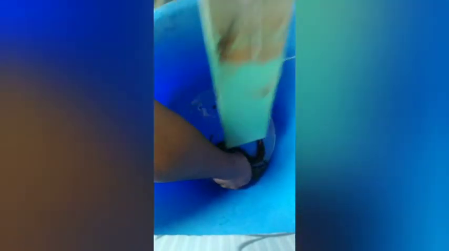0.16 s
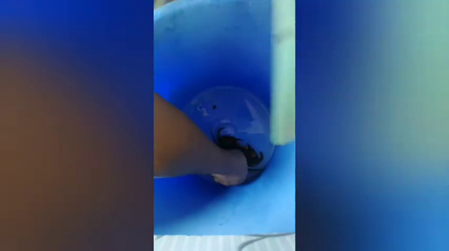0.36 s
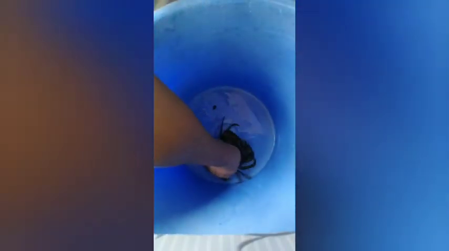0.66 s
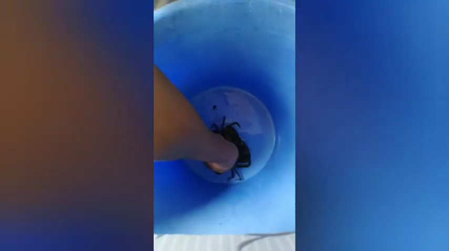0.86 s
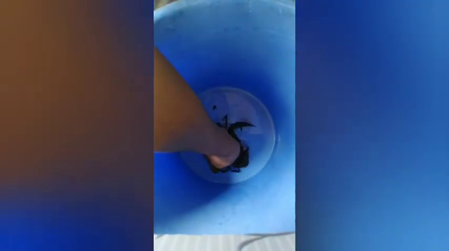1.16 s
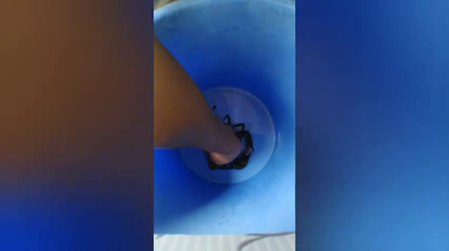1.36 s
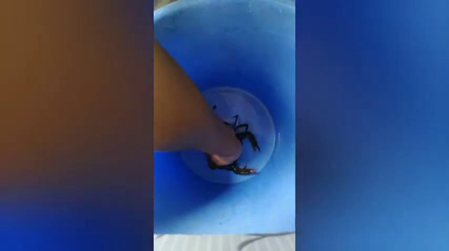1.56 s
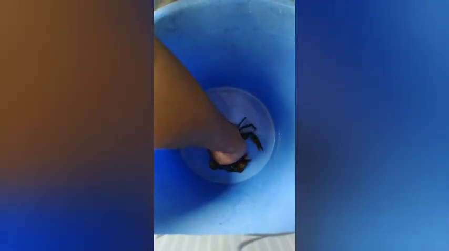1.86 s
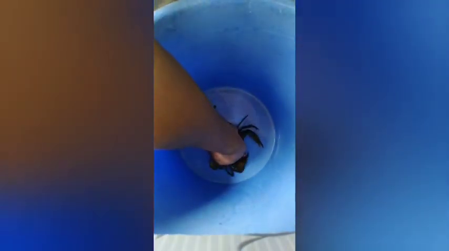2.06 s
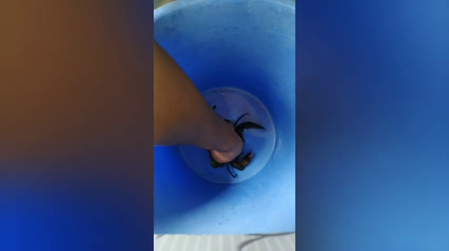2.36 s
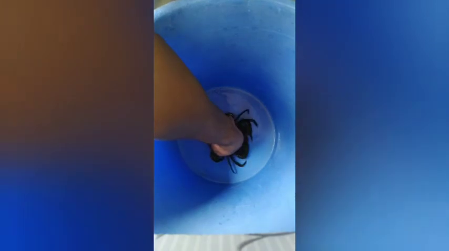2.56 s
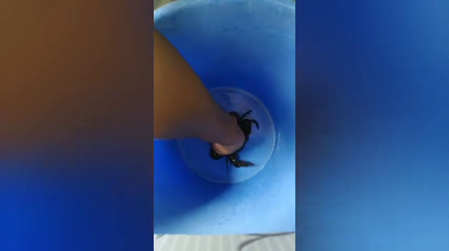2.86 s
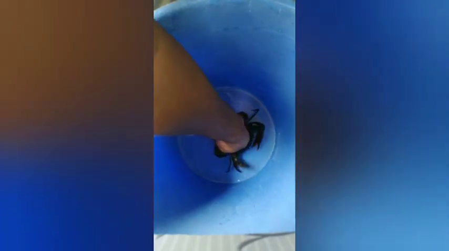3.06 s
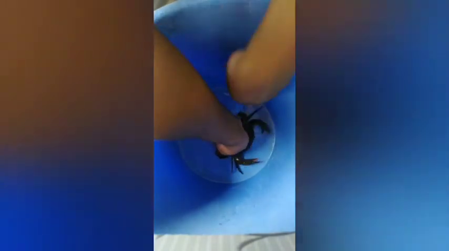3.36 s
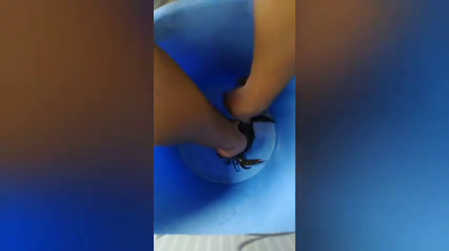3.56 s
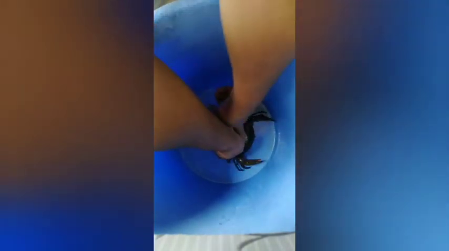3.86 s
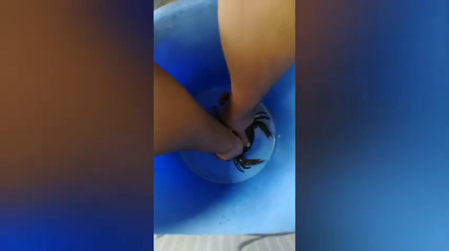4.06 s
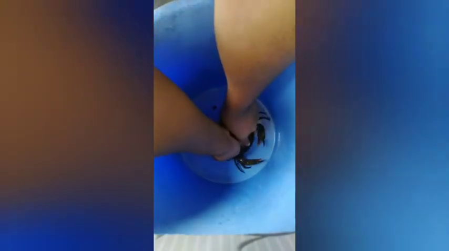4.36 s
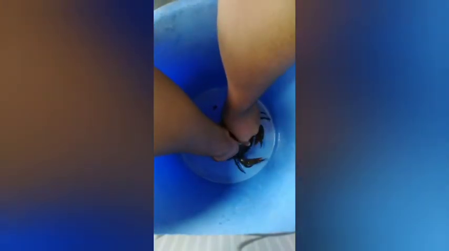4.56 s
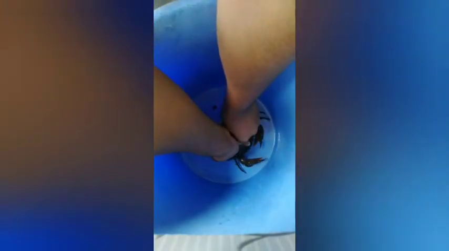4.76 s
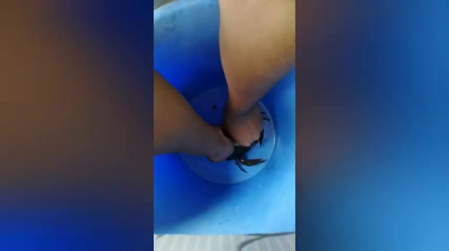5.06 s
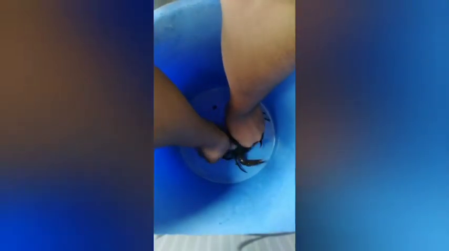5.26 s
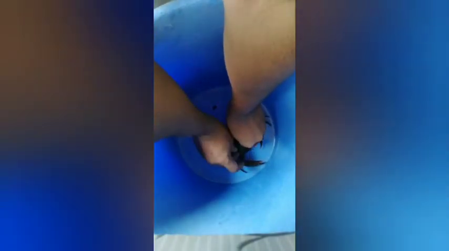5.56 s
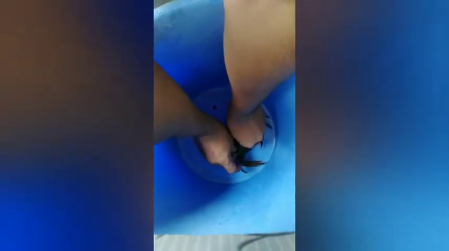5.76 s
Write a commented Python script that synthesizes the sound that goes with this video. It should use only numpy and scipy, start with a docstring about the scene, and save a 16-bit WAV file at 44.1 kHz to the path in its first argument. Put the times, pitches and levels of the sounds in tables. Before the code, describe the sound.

A live crab held by hand against the bottom of a plastic bucket scrapes, clacks and squeaks in uneven bursts, with dull low thumps as weight shifts. After about three and a half seconds the activity drops to sparse faint ticks over a soft outdoor hush, ending with a small knock. Close stereo microphones just above the rim, most sounds leaning right.

```python
"""Outdoors, a hand pins a live crab to the bottom of a plastic bucket, heard by two microphones just above the rim.
Legs and shell scrape the wall: stick-slip trains excite its bending modes, and locked slips squeak as gliding tones.
Claws knock, as clicks that set the wall modes ringing; shoves and rocking sound the low modes of the bottom.
A short echo inside the bucket, faint tones from afar and a soft hush of filtered noise complete the scene."""
import sys
import numpy as np
from scipy import signal
from scipy.fft import rfft, irfft, next_fast_len
from scipy.io import wavfile
from scipy.ndimage import uniform_filter1d

SR = 44100
rng = np.random.default_rng(int(sys.argv[2]) if len(sys.argv) > 2 else 0)


def wav_out(sig):
    """Save sig, one row per channel (or a flat mono array), as 16-bit PCM at SR to the path in sys.argv[1]."""
    wavfile.write(sys.argv[1], SR, np.round(np.clip(np.atleast_2d(sig).T, -1, 1) * 32767).astype(np.int16))


def ratio(d):
    """dB to gain"""
    e = np.asarray(d, float) / 20
    return 10 ** e


N = 260190   # samples
STEP = 40   # samples between control points

# All levels in the tables are relative dB.
# Legs and shell dragged on the wall. Each row: peak time in seconds, rise in seconds, fall in seconds,
# ring level in dB, rasp above ring in dB.
SCRAPES = [(0.04, 0.036, 0.16, -30.5, -6), (0.224, 0.032, 0.14, -30, -8.5),
           (0.329, 0.0022, 0.026, -28.5, -1), (0.426, 0.002, 0.049, -21, -2),
           (0.436, 0.016, 0.074, -22.5, -14), (0.587, 0.0065, 0.12, -36.5, -3.5),
           (0.624, 0.002, 0.03, -27.5, 2), (0.701, 0.11, 0.14, -38, -16), (0.732, 0.0042, 0.038, -29, -6.5),
           (0.839, 0.01, 0.037, -29.5, -5), (0.96, 0.0024, 0.088, -25, -4.5),
           (1.007, 0.0072, 0.023, -23, -3), (1.155, 0.033, 0.013, -29, -8.5),
           (1.213, 0.046, 0.21, -37, -18), (1.276, 0.055, 0.053, -22.5, -1), (1.38, 0.018, 0.065, -26, -7),
           (1.409, 0.002, 0.058, -24, -3), (1.734, 0.0093, 0.057, -24, -8.5),
           (2.173, 0.057, 0.053, -35, -7), (2.33, 0.0066, 0.0092, -45, -14),
           (2.344, 0.02, 0.051, -23.5, -5), (2.381, 0.0054, 0.068, -35, 7.5),
           (2.447, 0.12, 0.052, -22, -4.5), (2.542, 0.03, 0.025, -29, -11.5), (2.587, 0.018, 0.041, -31, 1),
           (2.639, 0.012, 0.073, -26.5, -1.5), (2.726, 0.051, 0.028, -28, -13),
           (2.773, 0.028, 0.216, -47.5, -7.5), (2.873, 0.021, 0.088, -29, -3),
           (2.915, 0.064, 0.071, -29.5, -1.5), (2.958, 0.035, 0.023, -27.5, -24),
           (3.009, 0.059, 0.042, -24, -9), (3.055, 0.094, 0.059, -23.5, -4.5),
           (3.169, 0.01, 0.026, -37.5, -3.5), (3.256, 0.027, 0.027, -32.5, -19.5),
           (3.278, 0.017, 0.044, -30, -24), (3.284, 0.09, 0.067, -36.5, -9.5),
           (3.402, 0.0098, 0.065, -33, -6.5), (3.934, 0.0055, 0.046, -44.5, 1.5),
           (4.098, 0.0077, 0.027, -49, -13), (4.219, 0.15, 0.033, -47.5, -14.5),
           (4.737, 0.01, 0.02, -42, -8), (5.177, 0.0058, 0.057, -52.5, -13),
           (5.466, 0.0074, 0.029, -50, 2.5), (5.615, 0.0035, 0.042, -62.5, 10),
           (5.807, 0.0072, 0.047, -40.5, -3)]
# The place of contact wandering over the wall. Each row: time in seconds, best-excited ring pitch in Hz,
# best-excited rasp pitch in Hz, left minus right in dB.
CONTACT = [(0.04, 900, 4400, -53), (0.29, 1260, 4430, -40), (0.33, 1170, 7100, -29),
           (0.426, 1140, 3700, -8.5), (0.437, 543, 3500, -9.5), (0.62, 1230, 5500, -24),
           (0.74, 850, 5200, -42), (0.96, 1380, 3100, -24), (1.2, 1170, 3500, -14),
           (1.279, 1270, 4500, -9.5), (1.371, 1210, 5300, -24), (1.409, 1830, 4500, -0.5),
           (1.73, 1010, 3200, -4), (2.171, 1200, 3500, -35), (2.35, 1960, 3500, -14),
           (2.43, 1980, 5500, 1.5), (2.54, 1010, 3200, -31), (2.73, 1020, 4000, -40),
           (2.88, 1260, 3700, -47), (2.96, 1160, 4500, -32), (3.051, 1200, 5200, -41),
           (3.17, 1150, 6200, -20), (3.27, 1160, 3000, -42), (3.41, 1010, 3200, -5), (3.93, 690, 4500, -31),
           (4.1, 550, 3500, -8), (4.74, 550, 3000, -12), (5.18, 1910, 3000, -13), (5.47, 2250, 3700, -17),
           (5.62, 1800, 5300, -2), (5.8, 2330, 3300, -14)]
# Bending modes of the wall. Each row: frequency in Hz, level in dB, undamped t60 in seconds.
WALL_MODES = [(553.5, -5, 0.5), (700, 2, 0.13), (801, -1.5, 0.077), (900, -31, 0.32), (1041, -1.5, 0.05),
              (1123, -6.5, 0.032), (1178, 1, 0.061), (1343, 3.5, 0.02), (1518, -3.5, 0.066),
              (1743, -6, 0.092), (1882, -5.5, 0.077), (2183, -1.5, 0.024), (2460, 2.5, 0.024),
              (2690, -0.5, 0.041)]
# Spectrum of the short high wall modes. Each row: frequency in Hz, level in dB per Hz.
RASP_SPECTRUM = [(1530, -30), (2600, -5), (3320, -3.5), (4390, -7.5), (5270, -7), (5870, -9), (7480, -8.5),
                 (8780, -22), (14400, -27.5), (16000, -48)]
# Shell squeaking where slips lock to one rate. Each row: peak time in seconds, rise in seconds, fall in seconds,
# level in dB, pitch at the peak in Hz, glide in Hz per second.
SQUEAKS = [(1.11, 0.024, 0.26, -38, 982, 609.5), (1.15, 0.01, 0.037, -39, 2475, 2),
           (1.22, 0.037, 0.09, -28.5, 1237, 597.5), (1.387, 0.031, 0.029, -42, 5260, -1),
           (1.419, 0.0098, 0.033, -20.5, 1703, -800), (2.396, 0.016, 0.032, -26, 1750, -2.5),
           (2.884, 0.024, 0.058, -30.5, 2460, -2.5)]
# Claws and knuckles on the wall. Each row: time in seconds, peak level in dB, snap above peak in dB,
# left minus right in dB.
KNOCKS = [(0.042, -14.5, 2, -29), (0.327, -10, -26, -39), (0.424, -23, 2, 0), (0.624, -19.5, 13.5, -30),
          (0.71, -29, -10, -31), (0.733, -23, -17, -28), (0.84, -34, -5, -24), (0.958, -6.5, -33, -16.5),
          (1.006, -29, -3, 10), (1.212, -43, -12, -20), (1.285, -11.5, 0, 10), (1.407, -15.5, 10.5, -9),
          (1.735, -10, -2, -40), (2.329, -20, -2, -22), (2.381, -24.5, 21.5, 3), (2.574, -31.5, 14.5, -27),
          (2.641, -19, -23, -33), (3.094, -29, 13.5, -27.5), (3.4, -19, -5, -28), (3.933, -25.5, -4, -14),
          (5.467, -46, 4, -12), (5.805, -26.5, 3.5, -23)]
# Weight shifting on the bottom. Each row: peak time in seconds, rise in seconds, fall in seconds, boom level in dB.
SHOVES = [(0.062, 0.071, 0.25, -32.5), (0.348, 0.03, 0.027, -27), (0.436, 0.014, 0.063, -17.5),
          (0.747, 0.049, 0.0063, -27), (0.793, 0.046, 0.013, -32), (0.92, 0.056, 0.023, -29.5),
          (1.312, 0.047, 0.067, -19.5), (1.742, 0.018, 0.064, -22), (2.19, 0.06, 0.051, -39),
          (2.455, 0.02, 0.056, -17), (2.598, 0.015, 0.037, -23.5), (2.64, 0.012, 0.078, -21.5),
          (2.96, 0.006, 0.046, -27), (3.074, 0.045, 0.065, -23), (3.55, 0.02, 0.044, -40),
          (4.251, 0.1, 0.031, -42.5), (4.41, 0.057, 0.065, -42.5), (4.62, 0.073, 0.031, -50.5),
          (4.73, 0.092, 0.053, -42.5), (5.81, 0.012, 0.051, -38.5)]
# Modes of the bottom and the air column, deepest first. Each row: frequency in Hz, level in dB, t60 in seconds.
BOTTOM_MODES = [(126.4, 3.5, 0.14), (182, -5.5, 0.14), (232.4, 8, 0.29), (276, 0, 0.1), (302.4, -5, 0.093),
                (341.5, -2.5, 0.083), (398, -3.5, 0.11), (466.5, -7, 0.083), (590, -6, 0.067)]
# The whole bucket rocking and landing. Each row: peak time in seconds, level in dB.
ROCKS = [(0.46, -30.5), (0.92, -46.5), (3.42, -57)]
# Faint tones from afar. Each row: peak time in seconds, rise in seconds, fall in seconds, level in dB, pitch in Hz.
FAR_TONES = [(1.95, 0.24, 0.86, -65, 590), (4.1, 1, 1, -62.5, 660.5), (5.82, 0.038, 0.063, -41.5, 936)]
# Spectrum of the outdoor hush. Each row: frequency in Hz, level in dB per Hz.
HUSH_SPECTRUM = [(20, -46.5), (60, -8.5), (120, 4.5), (300, 3), (480, 1), (600, 1.5), (850, 1),
                 (1400, -3.5), (2300, -6), (3500, -9.5), (5000, -7.5), (7600, -11), (8600, -26.5),
                 (16000, -36.5)]
# Course of the hush. Each row: time in seconds, level in dB.
HUSH_LEVEL = [(0.0, -54), (1.1, -50), (2.101, -57.5), (2.48, -50.5), (3.779, -56), (5.9, -60)]
# Likeness of the hush at the two microphones. Each row: frequency in Hz, left-right correlation (no unit).
HUSH_LIKENESS = [(100, 0.88), (500, 1), (1000, 0.65), (2000, 0.7), (5000, 0.015)]
# Balance of the hush. Each row: frequency in Hz, left minus right in dB.
HUSH_BALANCE = [(60, -5), (240, -6), (950, 1.5), (3770, -2), (15000, -5.5)]

RUBBED_DAMPING, RASP_FALL_SHARE = 0.48, 0.87   # share of undamped t60 under a limb; rasp fall over ring fall
RASP_CHANCE_DB, RASP_CYCLES = 4, 15   # uneven rasp mode shares per stroke; cycles per t60
LEAN_DB, LEAN_LAG_S = -10, 0.013   # push on the bottom with each scrape: its table level against the ring, its delay
DEEP_DB = -17.5   # level offset of the deepest mode in all pushes
BOOM_BALANCE_DB = -7   # left minus right
ROCK_RISE_S, ROCK_FALL_S = 0.026, 0.063
LEFT_LAG = 17   # samples by which the farther left microphone hears later


def rms_one(x):
    """Normalisation: scale to unit rms."""
    return x / np.sqrt(np.mean(x ** 2) + 1e-20)


def at_hz(points, hz):
    """Interpolation on a logarithmic frequency axis."""
    point_hz, values = np.transpose(points)
    return np.interp(np.log(hz + 1), np.log(point_hz), values)


def full_rate(control):
    """Linear interpolation of control points to one value a sample."""
    return np.interp(np.arange(N) / STEP, np.arange(len(control)), control)


def swells(s, rise, fall, level_db):
    """Power envelopes: each stroke is 20 dB down one rise before and one fall after its peak."""
    late = np.arange(N // STEP + 2) * STEP / SR - s[:, None]
    scale = np.where(late < 0, rise[:, None], fall[:, None])
    lengths = np.abs(late) / np.maximum(scale, .002)
    curve = np.where(late < 0, 1.5, 1.25)
    return ratio(level_db[:, None] - 20 * lengths ** curve) ** 2


def drift(rate_hz):
    """Low-passed noise: a slow random course of unit rms."""
    r = np.exp(-2 * np.pi * STEP * rate_hz / SR)
    noise = rng.standard_normal(N // STEP + 2002)
    slow = signal.lfilter([1], [1, -2 * r, r * r], noise)[2000:]   # drop the filter's start
    return full_rate(rms_one(slow))


def ring(clicks, hz, t60):
    """Damped resonance: a unit click starts a decaying sine of initial height 1."""
    r = ratio(-60 / (max(t60, .003) * SR))
    w = 2 * np.pi * hz / SR
    return signal.lfilter([0, np.sin(w)], [1, -2 * r * np.cos(w), r * r], clicks + 1e-18)


def slips(per_s, spread_db, clump_db, clump_hz, channels):
    """Stick-slip friction: random slips of uneven size, in clumps, with random signs at each microphone."""
    sizes = ratio(spread_db * np.minimum(rng.exponential(1, N), 4) + clump_db * drift(clump_hz))
    happens = rng.random(N) < per_s / SR
    return sizes * happens * rng.choice([-1, 1], (channels, N))


def sides(pan_db):
    """Level difference: left and right gains of constant total power."""
    gains = ratio(np.array([pan_db / 2, -pan_db / 2]))
    return 2 * gains / np.sqrt(np.sum(gains ** 2, axis=0))


def evened(x, window_s):
    """Level equalisation: hold the slow rms at 1, so that the stroke sets the loudness."""
    return x / np.sqrt(uniform_filter1d(x ** 2, int(window_s * SR), axis=-1) + 1e-12)


def rubbed(modes, shares_db, power, pans, trains, wander_db, wander_hz):
    """Driven resonance: slip trains sustain the modes, among which each stroke divides its power in its own way."""
    shares = ratio(shares_db) ** 2
    shares = shares / shares.sum(axis=1, keepdims=True)
    out = 0
    for k, (hz, t60) in enumerate(modes):
        gains = [full_rate(np.sqrt((shares[:, k] * pan ** 2) @ power)) for pan in pans]
        once = ring(trains[k % len(trains)], hz, t60 / 4)
        tone = evened(ring(once, hz, t60), 0.081)   # two passes of the resonance give it steeper skirts
        out = out + tone * gains * ratio(wander_db * drift(wander_hz) - 1)
    return out


def contact(s):
    """Point of excitation: best-excited ring and rasp pitch and left-right balance at the given moments."""
    at, *columns = np.transpose(CONTACT)
    return [np.interp(s, at, column) for column in columns]


def scraping(focus_db=10.0, chance_db=3.0, rasp_focus_db=6.5):
    """Modal excitation by friction: strokes favour modes near the contact's pitch; crowded high modes make the rasp."""
    s, rise, fall, ring_db, rasp_db = np.transpose(SCRAPES)
    best_hz, rasp_hz, pan_db = contact(s)
    hz, level_db, t60 = np.transpose(WALL_MODES)
    high_hz = np.geomspace(2900, 15500, num=20)
    chance = rng.normal(0, 1, (len(s), len(hz) + len(high_hz)))
    pans = sides(pan_db)

    octaves_off = np.abs(np.log2(hz / best_hz[:, None]))
    shares_db = level_db - focus_db * octaves_off + chance_db * chance[:, :len(hz)]
    coarse = [slips(1500, 3.3, 3.7, 73, channels=2) for _ in range(3)]
    power = swells(s, rise, fall, ring_db)
    rings = rubbed(zip(hz, RUBBED_DAMPING * t60), shares_db, power, pans, coarse, 1.8, 7.8)

    # modes spaced by ratio each cover more hertz higher up
    shares_db = at_hz(RASP_SPECTRUM, high_hz) + 10 * np.log10(high_hz) + RASP_CHANCE_DB * chance[:, len(hz):]
    shares_db += .5 * (rasp_db[:, None] - 5.0) * np.log2(high_hz / high_hz[0])   # weak rasps are duller as well
    shares_db -= rasp_focus_db * np.minimum(np.abs(np.log2(high_hz / rasp_hz[:, None])), 1)
    fine = [slips(4000, 2.3, 4.8, 65, channels=2) for _ in range(3)]
    power = swells(s, rise, RASP_FALL_SHARE * fall, ring_db + rasp_db)
    rasp = rubbed(zip(high_hz, RASP_CYCLES / high_hz), shares_db, power, pans, fine, 2.0, 30)
    return rings + rasp


def squeaking(waver_hz=60, pan_db=-10, octave_db=-19):
    """Phase-locked stick-slip: slips at one rate give a rough gliding tone with a weak octave."""
    s, rise, fall, level_db, hz, glide = np.transpose(SQUEAKS)
    t, out = np.arange(N) / SR, 0
    for power, s0, hz0, slope in zip(swells(s, rise, fall, level_db), s, hz, glide):
        pitch = hz0 + slope * (t - s0) + waver_hz * drift(82.0)
        phase = 2 * np.pi * np.cumsum(pitch) / SR
        tone = np.sin(phase) + ratio(octave_db) * np.sin(2 * phase)
        out = out + full_rate(np.sqrt(2 * power)) * tone
    return out * ratio(3 * drift(70)) * sides(pan_db)[:, None]


def knocking(ring_db=-13, damping=0.14, snap_db=-10.5, snap_cycles=25.0, spread_s=0.00042, focus_db=7.0):
    """Impulsive excitation: a knock starts the wall modes, damped by the hand, and short high modes as a dry snap."""
    s, peak_db, bright_db, pan_db = np.transpose(KNOCKS)
    at, out = np.round(s * SR).astype(int), np.zeros((2, N))
    rasp_hz = contact(s)[1]
    modes = [(hz, level_db + ring_db, damping * t60) for hz, level_db, t60 in WALL_MODES]
    for hz in np.geomspace(2900, 12000, num=9):
        focus = focus_db * np.abs(np.log2(hz / rasp_hz))
        level_db = at_hz(RASP_SPECTRUM, hz) + snap_db + bright_db + 4.5 - focus
        modes.append((hz, level_db, snap_cycles / hz))
    chance = rng.normal(0, 1, (len(s), 2, len(modes)))
    # each mode starts at a random moment within spread_s, softening the click
    onset_delay = (spread_s * SR * rng.random((len(s), len(modes)))).astype(int)
    for k, (hz, level_db, t60) in enumerate(modes):
        clicks = np.zeros((2, N))
        uneven = 1 + .3 * chance[:, :, k].T
        clicks[:, at + onset_delay[:, k]] = sides(pan_db) * ratio(peak_db + level_db) * uneven
        out += ring(clicks, hz, t60)
    # knocks kept between 600 and 7600 Hz
    knock_band = signal.butter(4, [600, 7600], "band", fs=SR, output="sos")
    return signal.sosfilt(knock_band, out)


def booming(chance_db=4.0):
    """Low-mode excitation: soft pushes sustain the modes of the bottom, in phase at both microphones."""
    leans = [(s + LEAN_LAG_S, rise, fall, db + LEAN_DB) for s, rise, fall, db, _ in SCRAPES]
    s, rise, fall, boom_db = np.transpose(list(SHOVES) + leans)
    hz, level_db, t60 = np.transpose(BOTTOM_MODES)
    shares_db = level_db + chance_db * rng.normal(0, 1, (len(s), len(hz)))
    shares_db += 0.27 * (boom_db[:, None] + 33.0) * np.log2(hz / 232)   # harder shoves reach the higher modes
    shares_db[:, 0] = level_db[0] + DEEP_DB
    pushes = [slips(600, 2.84, 3.5, 29, channels=1) for _ in range(3)]
    boom = rubbed(zip(hz, t60), shares_db, swells(s, rise, fall, boom_db), [1], pushes, 0.4, 12)
    boom = signal.sosfilt(signal.butter(4, 110, "high", fs=SR, output="sos"), boom)
    return boom * sides(BOOM_BALANCE_DB)[:, None] * ratio(-4.0)


def rocking():
    """Fundamental resonance: the landing bucket sounds its deepest mode, a sine that swells and dies."""
    s, level_db = np.transpose(ROCKS)
    rise, fall = np.full(len(s), ROCK_RISE_S), np.full(len(s), ROCK_FALL_S)
    power = swells(s, rise, fall, level_db).sum(axis=0)
    deepest_hz = BOTTOM_MODES[0][0]
    tone = np.sin(2 * np.pi * deepest_hz * np.arange(N) / SR + rng.uniform(0, 2 * np.pi))
    return full_rate(np.sqrt(2 * power)) * tone * sides(BOOM_BALANCE_DB)[:, None]


def inside_echo(x, t60=0.053, level_db=-19):
    """Reverberation: sound runs round inside and reaches the opposite microphone as a short dense decay."""
    t = np.arange(int(.25 * SR)) / SR
    tail = rng.standard_normal((2, len(t))) * ratio(-60 * t / t60) * (t > .002)
    tail = signal.lfilter([.5], [1, -.5], tail)   # softens the treble
    tail = tail / np.sqrt(np.sum(tail[0] ** 2))
    return ratio(level_db) * signal.fftconvolve(x[::-1], tail, axes=1)[:, :N]


def far_tones():
    """Frequency modulation: thin tones swell and fade with a slightly unsteady pitch."""
    s, rise, fall, level_db, hz = np.transpose(FAR_TONES)
    out = 0
    for power, f in zip(swells(s, rise, fall, level_db), hz):
        phase = 2 * np.pi * np.cumsum(f * (1 + 0.00737 * drift(16.0))) / SR
        out = out + full_rate(np.sqrt(2 * power)) * np.sin(phase)
    return out


def hush():
    """Partial coherence: shaped distant noise, much alike at the microphones except in the treble."""
    size = next_fast_len(N)
    hz = np.fft.rfftfreq(size, 1 / SR)
    mid, side = rfft(rng.standard_normal((2, size)))
    alike = np.clip(at_hz(HUSH_LIKENESS, hz), 0, 1)
    both = np.sqrt(1 + alike) * mid + np.sqrt(1 - alike) * side * [[1], [-1]]
    shaped = both * ratio(at_hz(HUSH_SPECTRUM, hz)) * sides(at_hz(HUSH_BALANCE, hz))
    noise = irfft(shaped, size)[:, :N]
    s, level_db = np.transpose(HUSH_LEVEL)
    course_db = np.interp(np.arange(N) / SR, s, level_db) + 1.6 * drift(15.0)
    return rms_one(noise) * ratio(course_db)


def scene():
    """Superposition and path difference: bucket, echo, tones and hush add up; the left side arrives later."""
    wall = scraping() + squeaking() + knocking()
    # high-pass keeps the resonators' skirts out of the bass
    wall = signal.sosfilt(signal.butter(2, 300, "high", fs=SR, output="sos"), wall)
    bucket = wall + booming() + rocking()
    out = bucket + inside_echo(bucket) + far_tones() + hush()
    out[0] = np.concatenate([np.zeros(LEFT_LAG), out[0, :-LEFT_LAG]])
    return out


def band_limit(x):
    """A steep low-pass at the top of the band."""
    return signal.sosfilt(signal.butter(12, 15900, fs=SR, output="sos"), x)


def record(dry):
    """Signal chain: both microphone signals go through its last stage."""
    return band_limit(dry)


dry = scene()
out = record(dry)
wav_out(out)
```